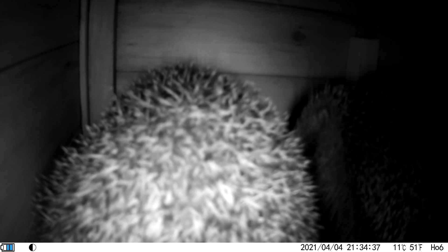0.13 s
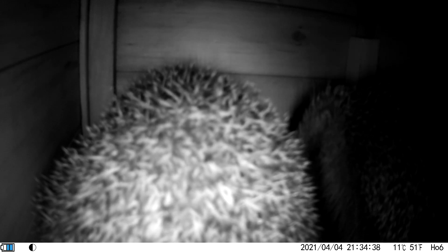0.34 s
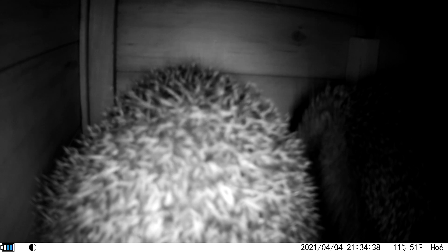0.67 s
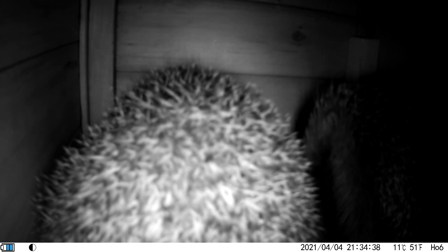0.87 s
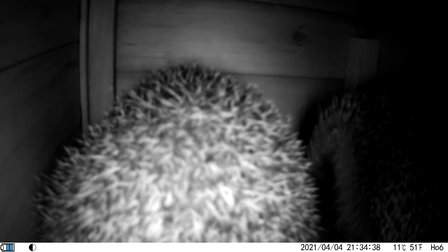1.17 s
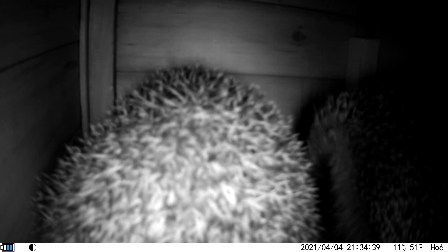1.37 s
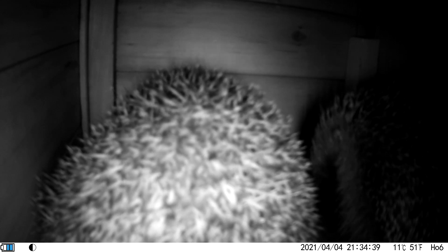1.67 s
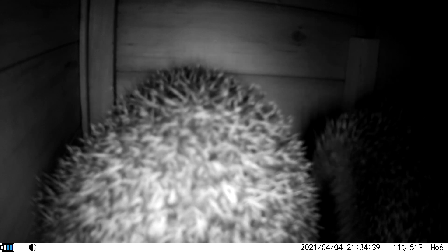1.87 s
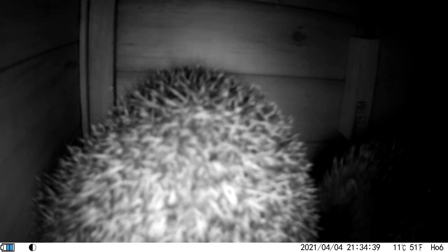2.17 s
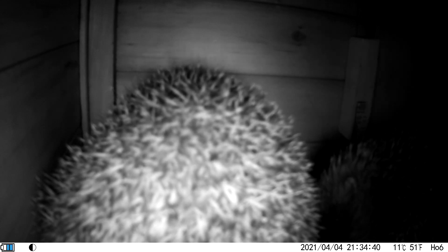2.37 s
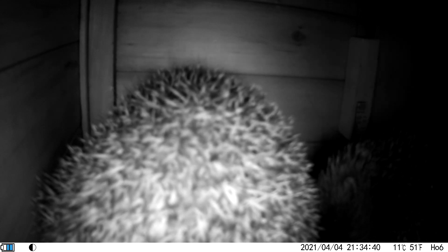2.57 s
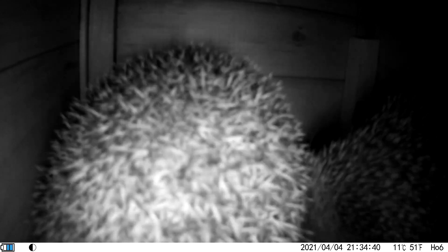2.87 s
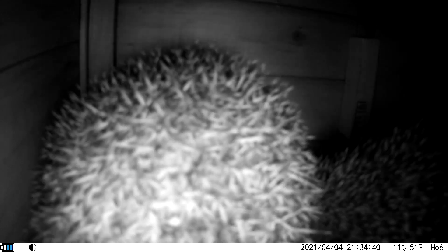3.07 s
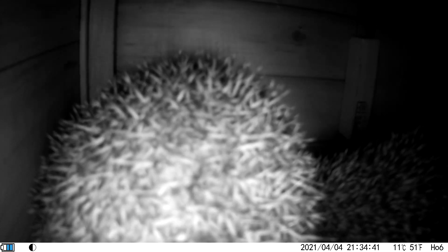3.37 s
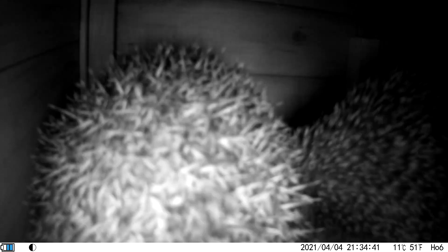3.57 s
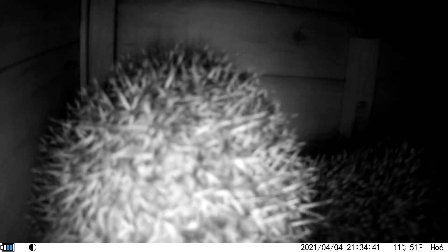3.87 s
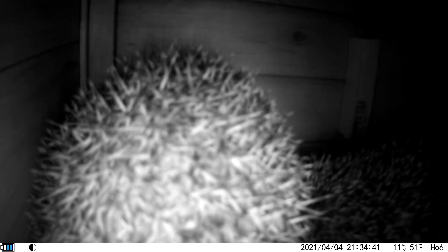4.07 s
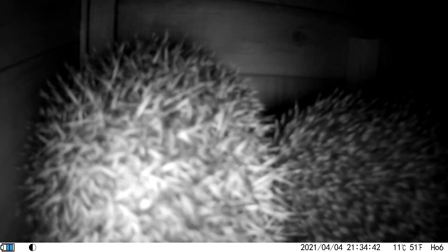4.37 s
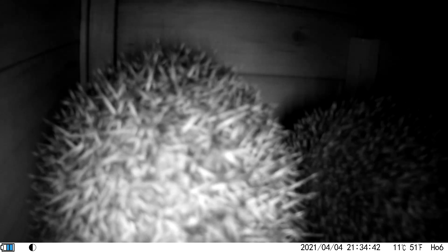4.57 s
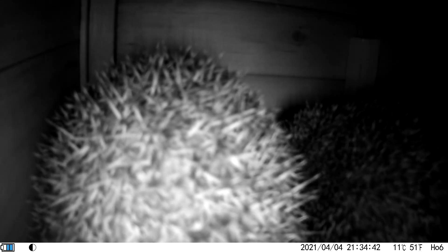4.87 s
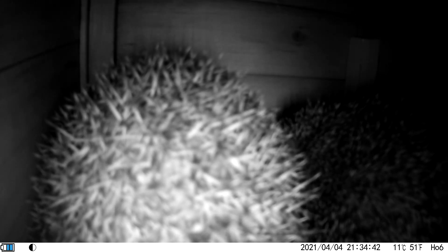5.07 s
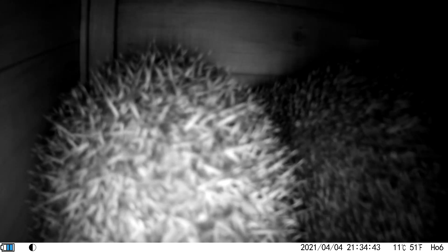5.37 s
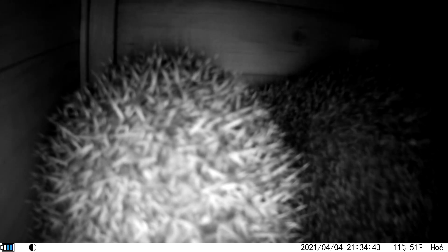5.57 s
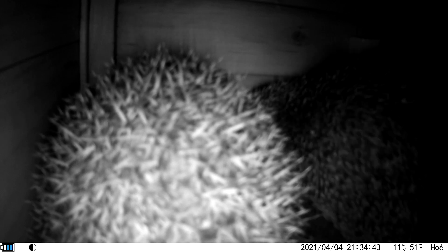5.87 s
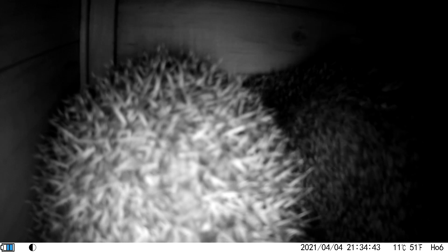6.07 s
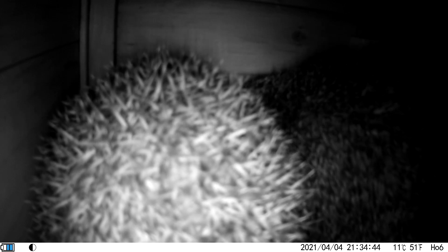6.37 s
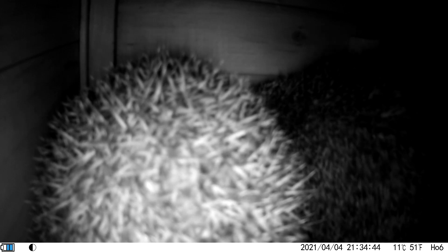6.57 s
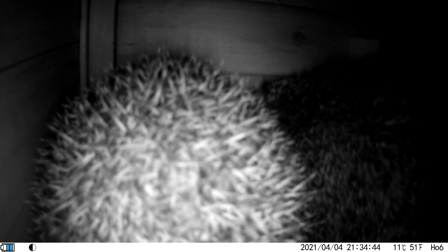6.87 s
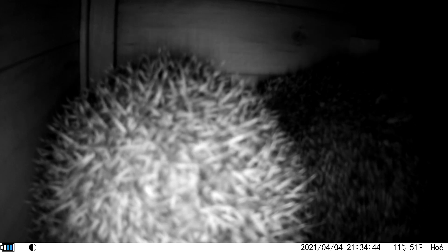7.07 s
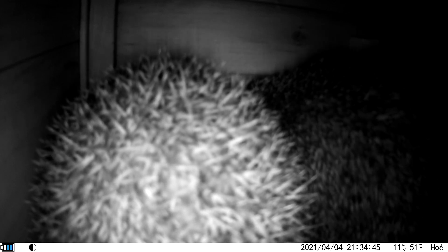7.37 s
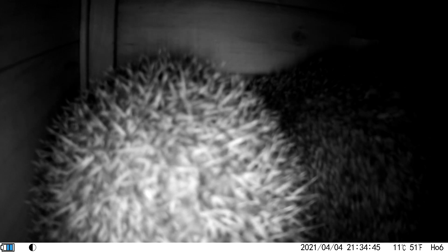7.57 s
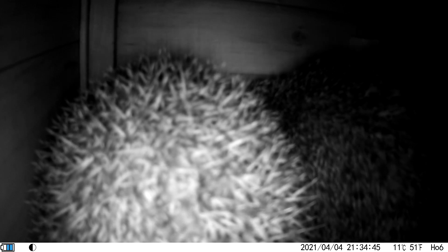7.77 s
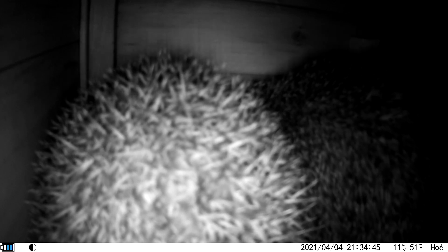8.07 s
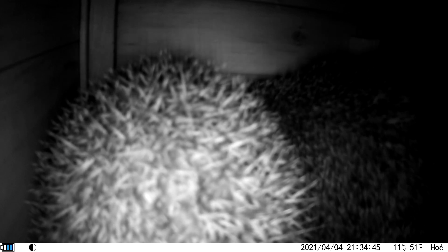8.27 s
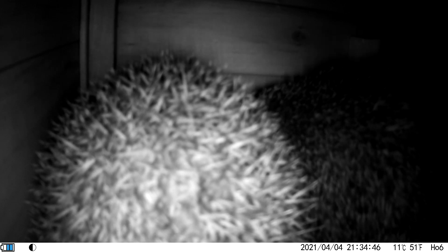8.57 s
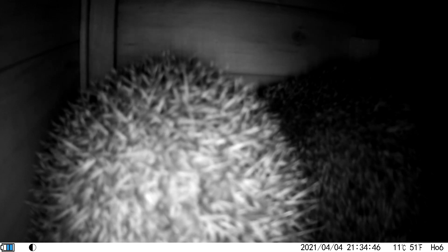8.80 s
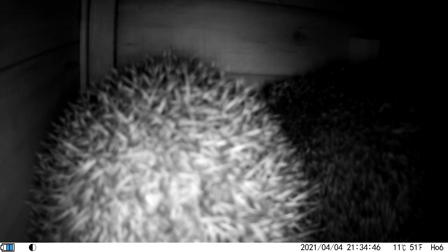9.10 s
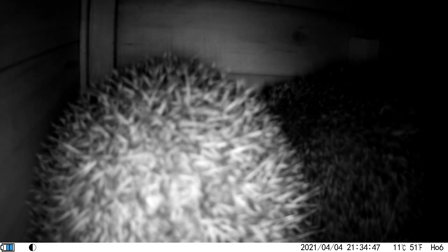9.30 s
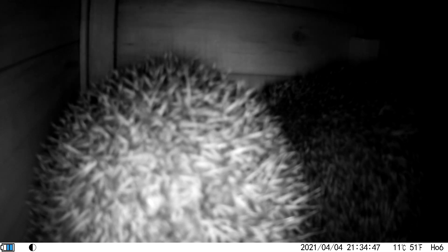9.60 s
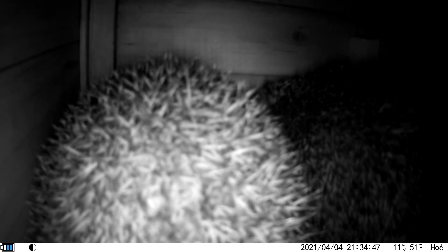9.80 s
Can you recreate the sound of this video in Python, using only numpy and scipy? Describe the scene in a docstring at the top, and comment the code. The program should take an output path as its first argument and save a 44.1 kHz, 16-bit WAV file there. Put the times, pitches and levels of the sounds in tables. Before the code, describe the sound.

A close microphone sits inside a small wooden feeding box at night, with very quiet outdoor rumble, faint electronic hiss and a barely audible low hum at the start and end. For the first 2.8 seconds there are only sparse, small crunches of dry pellets and soft wooden bumps near 1.1 and 2.1 seconds. At about 2.9 seconds two hedgehogs shove: a loud hollow knock strikes at 3.0, followed by rattling bumps and bristly spine scraping. A second flurry with dull floor thuds runs from 3.5 to 3.9. A weaker scuffle comes around 4.4 to 4.6, with a crisp crack at 4.6, then faint rubs and light knocks from 5.2 to 6.1. From 6.5 onward it is calm, with scattered brittle crunches, one sharper at 7.6, another at 8.6, becoming dense, brighter chewing from 8.9 to 10 seconds.

```python
"""Hedgehog bodies, two animals in a small wooden box at night, shove and knock the boards: struck modes ring.
Spines scrape: showers of random slips drive the same board modes. Teeth crack dry pellets: short grain
bursts through pellet resonances. Steps and leaning bodies drive the floor panel with bursts and low noise.
Below lie coloured noise (outdoor rumble, electronic hiss) and a low sine hum of wavering pitch and level."""
import sys
import numpy as np
from scipy import signal
from scipy.fft import rfft, irfft
from scipy.io import wavfile

SR = 44100
rng = np.random.default_rng(int(sys.argv[2]) if len(sys.argv) > 2 else 0)


def put_to_file(sound):
    """Save the sound as 16-bit audio at rate SR, in the file named by the first command-line argument."""
    columns = np.atleast_2d(sound).T  # one column per channel
    safe = np.clip(columns, -1, 1)
    whole_steps = np.round(safe * 32767)
    wavfile.write(sys.argv[1], SR, whole_steps.astype(np.int16))


def invert_db(x):
    """Field ratio 10**(x/20) for x, a level in decibels (scalar or array-like)."""
    u = np.asarray(x, float) / 20
    return 10 ** u


N = 438354


def rms_one(x):
    """Scale to rms 1."""
    return x / np.sqrt(np.mean(x ** 2) + 1e-30)


def soften(x, hz):
    """Second-order low-pass: a heavy part feels only the slow part of a blow."""
    return signal.sosfilt(signal.butter(2, hz, fs=SR, output="sos"), x)


def flicker(per_s):
    """Slow random drift of rms 1: noise low-passed at per_s Hz."""
    return rms_one(soften(rng.standard_normal(N), per_s))


def resonate(x, modes, spread_db=0):
    """Parallel two-pole resonances of alternating sign, each with a random level offset."""
    out = 0
    for k, (hz, width_hz, level_db) in enumerate(modes):
        radius = np.exp(-np.pi * width_hz / SR)
        gain = (1 - radius ** 2) / 2
        poles = [1, -2 * radius * np.cos(2 * np.pi * hz / SR), radius ** 2]
        ring = signal.lfilter([gain, 0, -gain], poles, x)
        strength = invert_db(level_db + spread_db * rng.standard_normal())
        out = out + (-1) ** k * strength * ring
    return out


def grains(count, per_s, size_db):
    """Random clicks of either sign; a few are much larger than the rest."""
    excess = np.minimum(rng.exponential(size=count), 4)
    sizes = invert_db(size_db * excess) * rng.choice([-1, 1], size=count)
    present = rng.random(size=count) < per_s / SR
    return sizes * present + 1e-18  # never all zero


def burst(count, length_ms, rise_ms, per_s):
    """A contact: a shower of grains that swells fast and dies away."""
    ms = np.arange(count) * 1000 / SR
    swell = 1 - np.exp(-ms / rise_ms)
    decay = np.exp(-ms / max(length_ms, 0.3))
    return grains(count, per_s, size_db=3.0) * swell * decay


def add(out, s, sound, peak_db):
    """Lay a sound in at a given peak, starting 2 ms before s so it is already swelling there."""
    i = round((s - 0.002) * SR)
    scaled = invert_db(peak_db) / np.max(np.abs(sound)) * sound
    out[i:i + len(sound)] += scaled[:N - i]


def curve(rows, silent_db=-120):
    """Interpolate table columns along the whole time axis."""
    s, *columns = np.transpose(rows)
    t = np.arange(N) / SR
    return [np.interp(t, s, c, left=silent_db, right=silent_db) for c in columns]


# noise spectrum, relative: pitch_hz, density_db
NOISE_SPECTRUM = [(12, -35), (20, -0.5), (104, -4), (209, -12), (326, -17.5), (819, -22.5), (916, -25.5),
                  (5170, -28.5), (13700, -28), (15800, -31.5)]
NOISE_RMS_DB = -61.5


def background():
    """Steady noise shaped in the spectrum: outdoor rumble below, hiss of the electronics above."""
    hz = np.arange(N // 2 + 1) * SR / N + 1  # +1 avoids log(0)
    points_hz, points_db = np.transpose(NOISE_SPECTRUM)
    colour = invert_db(np.interp(np.log(hz), np.log(points_hz), points_db))
    noise = irfft(colour * rfft(rng.standard_normal(N)), N)
    return invert_db(NOISE_RMS_DB) * rms_one(noise)


# hum spells: start_s, end_s, level_db
HUM_SPELLS = [(0.0, 1.095, -67), (8.9, 10.0, -66)]
HUM_HZ, HUM_FADE_DB_PER_S = 91.5, 41


def hum():
    """A faint low sine whose pitch and strength waver; it fades outside its spells."""
    t = np.arange(N) / SR
    spells = []
    for start_s, end_s, level_db in HUM_SPELLS:
        outside_s = np.maximum(0, np.maximum(start_s - t, t - end_s))
        spells.append(level_db - HUM_FADE_DB_PER_S * outside_s)
    level_db = np.max(spells, axis=0) + 2.3 * flicker(per_s=2.6)
    pitch_hz = HUM_HZ + 2.5 * flicker(per_s=4)
    phase = 2 * np.pi * np.cumsum(pitch_hz) / SR
    return invert_db(level_db) * np.sqrt(2) * np.sin(phase)


# floor panel modes: pitch_hz, width_hz, level_db
PANEL_MODES = [(45.3, 16, -11), (70.15, 25, -12.5), (100, 17, -6.5), (143.7, 20, -1.5), (161.6, 35, -2),
               (181, 36, -5), (238.65, 66, -15.5), (358, 56, -14.5)]
# body leans on the floor panel: peak_s, peak_db, release_db_per_s
BODY_LEANS = [(1.19, -41.5, 194), (2.1, -41, 177), (2.881, -32.5, 38), (2.99, -21, 192), (3.1, -31.5, 128),
              (3.29, -47, 300), (3.38, -50, 300), (3.57, -25.5, 300), (3.65, -29.5, 400), (3.73, -28, 120),
              (3.98, -53, 121), (4.43, -34, 83), (4.87, -53.5, 130), (5.26, -54.5, 250), (5.42, -43, 176),
              (5.65, -48.5, 300), (5.98, -48.5, 95.5), (6.2, -55, 101), (6.34, -57, 183),
              (6.78, -57, 150.5), (7.11, -60, 16.5), (7.86, -58.5, 30.5)]
LEAN_RISE_DB_PER_S, RESTING_DB = 252, -69.5


def weight():
    """Soft feet and bellies keep the floor panel murmuring; each lean swells and eases off."""
    t = np.arange(N) / SR
    load_db = RESTING_DB + 3.7 * flicker(per_s=3.5)
    for peak_s, peak_db, release_db_per_s in BODY_LEANS:
        fall_db = np.maximum(LEAN_RISE_DB_PER_S * (peak_s - t), release_db_per_s * (t - peak_s))
        load_db = np.maximum(load_db, peak_db - fall_db)
    rub = soften(rng.standard_normal(N), hz=300)
    return invert_db(load_db) * rms_one(resonate(rub, PANEL_MODES))


# teeth on pellets: time_s, high_peak_db, low_re_high_db, crumble_ms
PELLET_CRACKS = [(0.7342, -57, -16, 6.0), (1.0851, -46.5, 4, 4.7), (1.6258, -53, -2, 6.0),
                 (1.695, -40.5, -5, 5.2), (1.777, -59, 5, 6.9), (2.0735, -45.5, -3, 8.6),
                 (2.104, -54.5, 13, 20), (2.1298, -39, 0, 9.8), (2.656, -58, -8, 6.5),
                 (2.694, -49.5, -3, 5.5), (2.721, -57, 3, 13), (4.5988, -28.5, -10, 6.2),
                 (6.5114, -56, -1, 5.7), (6.5377, -54.5, 3.5, 4.4), (6.7092, -41.5, 5.5, 8.6),
                 (6.7139, -47, -11, 9.2), (6.781, -38, -4.5, 6.3), (7.0022, -43, 1, 6.8),
                 (7.043, -55.5, -4, 5.3), (7.2509, -53.5, -4, 6.7), (7.264, -50, -1.5, 7.7),
                 (7.3022, -45, -5.5, 8.7), (7.3378, -44.5, -8, 4), (7.5148, -56, -4, 6.0),
                 (7.5747, -51.5, 6, 8.7), (7.6042, -32, -7.5, 5.1), (7.893, -51.5, -3, 8.9),
                 (7.918, -45, -13.5, 5.1), (7.9448, -56, -10, 5.1), (8.6286, -33.5, -1, 8.7),
                 (8.9318, -32.5, -10, 7.3), (8.9426, -39, -4.5, 3.3), (8.9687, -56, 3.5, 3.3),
                 (9.0071, -32.5, -4.5, 5.5), (9.0645, -31.5, -5.5, 7.4), (9.1002, -52.5, -5, 6.6),
                 (9.267, -47, -2.5, 10), (9.3227, -48, -10.5, 4.9), (9.3322, -50, 4.5, 7.2),
                 (9.3624, -43, -5.5, 7.1), (9.3901, -49, -2, 5.2), (9.422, -55, 0, 9.6),
                 (9.438, -41, -2.5, 6.9), (9.622, -52, -1.5, 6.0), (9.645, -44.5, -3, 8.4),
                 (9.659, -49, -2, 14), (9.6955, -47.5, 0, 5), (9.8767, -52, -9, 11),
                 (9.9008, -44, 1.5, 7.6), (9.9188, -50.5, -1.5, 10)]
# pellet modes through jaw and box, low / high / top: pitch_hz, width_hz, level_db
LOW_MODES = [(560, 370, -14), (800, 30, 4.5), (1170, 100, -6), (1535, 120, -4.5), (1715, 280, -13),
             (2190, 95, -2), (2780, 760, -6), (3030, 300, -11)]
HIGH_MODES = [(3930, 700, -15.5), (4148, 1200, -6), (4440, 400, 3), (5170, 480, -6.5), (5040, 65, -1),
              (5686, 680, -14.5)]
TOP_MODES = [(7300, 370, 1), (7974, 330, 6.5), (8530, 220, 8.5), (7800, 140, -5.5), (10200, 400, -27.5)]
TOP_DB, TOP_SPREAD_DB = -17, 4.5  # re high part
BRIGHTER_FROM_S, BRIGHTER_DB = 8.94, 8.0  # top part of the later cracks
SNAP_DB, SNAP_BAND_HZ = -12, [1000, 5500]  # broad part, re high part
NIBBLES_PER_S, NIBBLE_DB = 0.88, -61


def nibbles():
    """Rows of faint cracks at exponentially spaced random times."""
    chance = rng.random((40, 2))
    times_s = np.cumsum(-np.log(1 - chance[:, 0]) / NIBBLES_PER_S) + 0.011
    peaks_db = NIBBLE_DB + 5.6 * (chance[:, 1] - 0.5)
    return [(s, peak_db, -3.0, 6.0) for s, peak_db in zip(times_s, peaks_db) if s < N / SR]


def crunches():
    """A pellet snaps and crumbles for a few ms: one grain burst drives its modes and a broad band."""
    out = np.zeros(N)
    broad = signal.butter(2, SNAP_BAND_HZ, "band", fs=SR, output="sos")
    for s, peak_db, low_db, crumble_ms in PELLET_CRACKS + nibbles():
        crack = burst(SR // 8, crumble_ms, rise_ms=0.31, per_s=12000)
        top_db = peak_db + TOP_DB + TOP_SPREAD_DB * rng.standard_normal()
        if s > BRIGHTER_FROM_S:
            top_db += BRIGHTER_DB
        add(out, s + 0.000991, resonate(crack, HIGH_MODES, spread_db=1.5), peak_db)
        add(out, s + 0.0012, signal.sosfilt(broad, crack), peak_db + SNAP_DB)
        add(out, s + 0.001103, resonate(crack, LOW_MODES, spread_db=2.5), peak_db + low_db)
        add(out, s + 0.0014, resonate(crack, TOP_MODES), top_db)
    return out


# spines and feet dragging, one list per shove: time_s, pressure_db, speed_db
BODY_SHOVES = [
    [(0.9, -75, 0.1), (0.994, -70, -6), (1.146, -60, 4), (1.316, -68.5, 3), (1.4, -90, 0.1)],
    [(1.85, -76, 0.1), (1.95, -70, -2), (2.09, -69, 5), (2.3, -80, 0.1)],
    [(2.78, -70, 5), (2.884, -30.5, -4.5), (2.934, -31.5, 5.5), (2.99, -18.5, 1.5), (3.032, -28.5, 3.5),
     (3.08, -26, 4.5), (3.2, -41.5, 3), (3.3, -52, 1), (3.46, -59.5, 5)],
    [(3.47, -49.5, -3), (3.542, -28, 0.5), (3.63, -31.5, 6), (3.68, -25, 3), (3.722, -29, 0.1),
     (3.81, -28.5, -3), (3.9, -46, 0), (3.96, -53.5, 0), (4.058, -67.5, 6), (4.15, -65.5, -3)],
    [(4.28, -74.5, 0), (4.39, -43, 0.3), (4.49, -32.5, -1), (4.522, -30.5, 1.5), (4.634, -49.5, 3),
     (4.7, -62.5, 3), (4.826, -60.5, 2.5), (4.97, -69, -4), (5.1, -72, 1)],
    [(5.12, -82, 0.5), (5.242, -64.5, 5), (5.358, -54.5, -3.5), (5.488, -63, 0.1), (5.6, -70, 5),
     (5.686, -66, -4), (5.82, -65, 2.5), (5.944, -59, 1), (6.1, -67.5, -2), (6.5, -76.5, -3)],
    [(7.6, -79, -2), (7.75, -73.5, -2), (8.05, -70, -3), (8.25, -80, -2)],
]
# box modes, boards / upper / treble / fizz: pitch_hz, width_hz, level_db
BOARD_MODES = [(571.8, 28, -8.5), (650, 32, -10), (789, 41, -2), (944, 47, -5), (1091, 89, -7.5),
               (1179.4, 46, -7), (1250, 44, -13.5)]
UPPER_MODES = [(1557, 61, 2), (1698, 78, -0.5), (1920, 170, -2.5), (2050, 120, -6.5), (2174, 100, -1),
               (2440, 110, -11.5), (2733, 260, -13.5)]
TREBLE_MODES = [(3019, 180, -8.5), (3480, 370, -0.5), (4180, 300, 1.5), (4450, 390, 2), (5200, 300, 3),
                (5900, 340, -12.5), (6630, 500, -10.5)]
FIZZ_MODES = [(6900, 270, -7), (7900, 500, -1.5), (8050, 500, 1), (9430, 900, -2.5), (11230, 1500, -11.5),
              (14500, 1500, -12.5)]
# answer of those four groups: level_re_pressure_db, db_per_db_of_speed, cutoff_hz
SHOVE_ANSWERS = [(-0.5, 0.0, 790), (-8.5, 0.4, 2800), (-18.5, 1, 9000), (-21, 1.52, 18000)]


def shoves():
    """Spine tips slip over the wood in clumps and ring its modes; faster slips sound brighter."""
    out = 0
    clumps_db = 2.8 * flicker(per_s=90) + 2.5 * flicker(per_s=25)
    pressure_db, speed_db = curve(sum(BODY_SHOVES, []))
    speed_db = np.maximum(speed_db, -20)
    groups = (BOARD_MODES, UPPER_MODES, TREBLE_MODES, FIZZ_MODES)
    for (part_db, per_speed, cutoff_hz), modes in zip(SHOVE_ANSWERS, groups):
        slips = grains(N, per_s=2500, size_db=2.5) * invert_db(clumps_db)
        ring = 0
        for mode in modes:  # each waxes and wanes as the points of contact wander
            ring = ring + resonate(slips * invert_db(4.0 * flicker(per_s=20)), [mode])
        level_db = pressure_db + part_db + per_speed * speed_db
        out = out + invert_db(level_db) * rms_one(soften(ring, cutoff_hz))
    return out


def favour(modes, favoured_hz, db_per_octave):
    """The spot struck decides which mode rings loudest: others drop with distance in pitch."""
    return [(hz, width_hz, level_db - db_per_octave * abs(np.log2(hz / favoured_hz)))
            for hz, width_hz, level_db in modes]


# knocks on the box: time_s, board_peak_db, hardness_db, favoured_board_hz
BOX_KNOCKS = [(0.974, -58, -10, 799), (1.012, -50.5, -21, 942), (1.086, -42, -6, 940),
              (1.104, -39, -6, 790), (1.163, -30, -14.5, 815), (2.087, -34, -34, 756),
              (2.83, -33.5, -7.5, 800), (2.869, -20, -7, 770), (2.914, -24, -16, 764),
              (2.973, 1.5, -17, 820), (2.998, -31, -11, 770), (3.022, -10, -10, 1170),
              (3.034, -23.5, 5.5, 970), (3.069, -17.5, -2.5, 560), (3.094, -16, 1, 880),
              (3.108, -30, 8.5, 810), (3.137, -19.5, 6, 820), (3.202, -24.5, -2.5, 870),
              (3.263, -25.5, 3.5, 835), (3.292, -28.5, -5.5, 948), (3.351, -25, -7.5, 900),
              (3.379, -36, 0.5, 965), (3.414, -35, -6, 950), (3.434, -49, -5, 966), (3.485, -22, -4, 810),
              (3.504, -17, -15, 789), (3.537, -28, -1, 813), (3.62, -29.5, 2.5, 506),
              (3.645, -11, -11.5, 796), (3.688, -9.5, -4.5, 790), (3.717, -15.5, -4.5, 1140),
              (3.728, -12, -2.5, 960), (3.759, -15.5, -10, 825), (3.806, -17.5, -19, 910),
              (3.826, -9.5, -11.5, 870), (3.869, -34, -5, 1040), (3.968, -39, -4.5, 1020),
              (4.338, -44, -6.5, 783), (4.373, -39, -22, 1060), (4.392, -38, -14, 790),
              (4.405, -35.5, -6, 690), (4.435, -30, -6, 815), (4.458, -24.5, -12, 640),
              (4.505, -19.5, -6.5, 890), (4.528, -30, 3.5, 826), (4.562, -25.5, -4, 1110),
              (4.596, -25, -7.5, 864), (4.635, -45, -5.5, 773), (4.653, -43.5, -2, 966),
              (4.711, -56, -2, 781), (4.771, -46, -11, 910), (4.81, -44, -12, 940),
              (4.834, -44.5, -5.5, 800), (4.872, -56, -8, 790), (5.191, -49.5, -6, 759),
              (5.228, -45, -5, 1170), (5.244, -43.5, -4, 1050), (5.297, -37.5, 0, 789),
              (5.339, -33.5, -6.5, 810), (5.373, -41.5, -2, 807), (5.401, -41, -10, 767),
              (5.614, -37.5, -2, 765), (5.699, -54.5, -2.5, 784), (5.785, -49.5, -6, 815),
              (5.87, -49, -2, 775), (5.885, -53.5, 2, 1180), (5.96, -32, -16, 630), (6.049, -50.5, -6, 810),
              (7.69, -56, -9.5, 1010), (7.846, -53, -5, 586)]
KNOCK_UPPER_DB, KNOCK_TREBLE_DB, TREBLE_DB_PER_HARDNESS_DB = 1.5, -8.5, 2
KNOCK_PANEL_DB, PANEL_DB_PER_KNOCK_DB = -38, 0.26


def knocks():
    """Each contact rings the boards; hardness lifts the upper modes, the floor panel answers late."""
    out = np.zeros(N)
    for s, ring_db, hardness_db, favoured_hz in BOX_KNOCKS:
        hit = burst(SR // 5, length_ms=6.1, rise_ms=0.45, per_s=3400)
        struck = favour(BOARD_MODES, favoured_hz, db_per_octave=11.0)
        upper_db = ring_db + KNOCK_UPPER_DB + hardness_db
        treble_db = ring_db + KNOCK_TREBLE_DB + TREBLE_DB_PER_HARDNESS_DB * hardness_db
        panel_db = KNOCK_PANEL_DB + PANEL_DB_PER_KNOCK_DB * ring_db
        add(out, s, resonate(soften(hit, hz=1600), struck, spread_db=3.5), ring_db)
        add(out, s, resonate(soften(hit, hz=2700), UPPER_MODES, spread_db=4.0), upper_db)
        add(out, s, resonate(hit, TREBLE_MODES, spread_db=5.5), treble_db)
        add(out, s, resonate(soften(hit, hz=8050), FIZZ_MODES, spread_db=7.5), treble_db - 7.5)
        add(out, s + 0.0074, resonate(soften(hit, hz=300), PANEL_MODES, spread_db=3.5), panel_db)
    return out


# heavy steps on the floor panel: time_s, peak_db, favoured_panel_hz
HEAVY_STEPS = [(1.104, -45, 130), (1.164, -33.5, 97), (2.087, -35, 106), (2.914, -28, 150),
               (3.034, -28, 147), (3.094, -19, 162), (3.137, -26.5, 147), (3.503, -31, 181),
               (3.537, -14, 155), (3.688, -25, 145), (4.406, -40, 140), (4.596, -39, 200),
               (4.872, -47.5, 150), (5.401, -47, 160), (5.613, -39, 125), (5.923, -51, 150),
               (5.961, -28, 129)]


def thuds():
    """A heavy step rings only the floor panel, most in the mode nearest its favoured pitch."""
    out = np.zeros(N)
    for s, peak_db, favoured_hz in HEAVY_STEPS:
        hit = burst(SR // 5, length_ms=5.5, rise_ms=0.45, per_s=3700)
        struck = favour(PANEL_MODES, favoured_hz, db_per_octave=9.0)
        add(out, s + 0.004, resonate(soften(hit, hz=295), struck, spread_db=3.0), peak_db)
    return out


def scene():
    """Everything at one microphone."""
    steady = background() + hum() + weight()
    return (steady + crunches() + shoves() + knocks() + thuds())[None]


def band_limit(x):
    """A steep low-pass at the top of the band."""
    return signal.sosfilt(signal.butter(12, 15940, fs=SR, output="sos"), x)


def record(dry):
    """Tanh rounds the loudest peaks; a steep low-pass is 60 dB down from 16250 Hz."""
    rounded = 0.76 * np.tanh(dry / 0.75)
    low_pass = signal.cheby2(14, 60, 16250, fs=SR, output="sos")
    mix = signal.sosfilt(low_pass, rounded)
    return band_limit(mix)


dry = scene()
out = record(dry)
put_to_file(out)
```